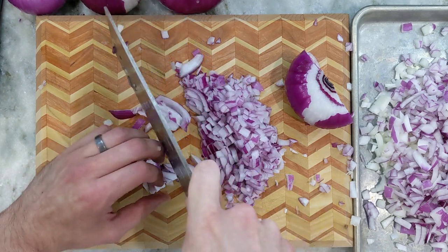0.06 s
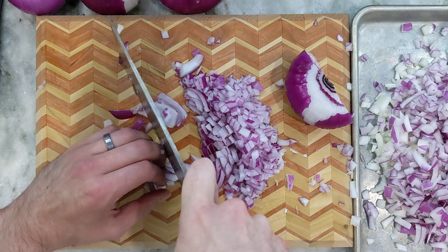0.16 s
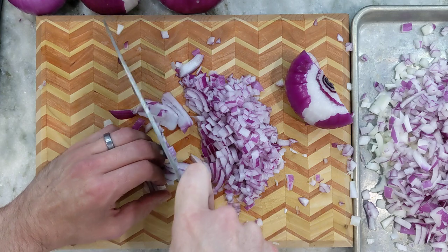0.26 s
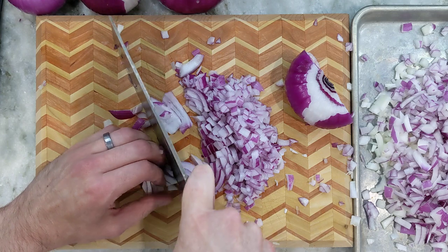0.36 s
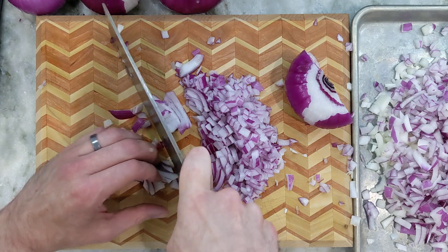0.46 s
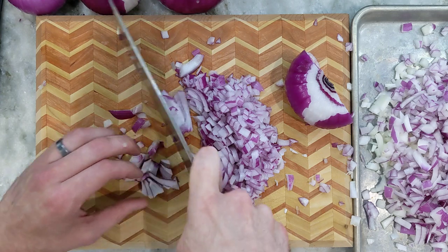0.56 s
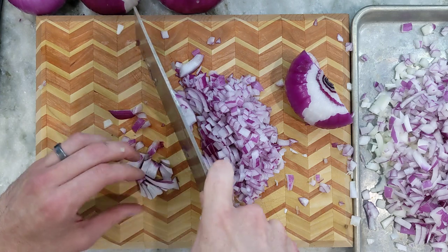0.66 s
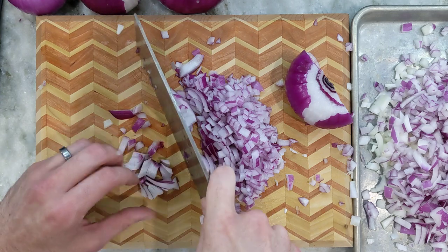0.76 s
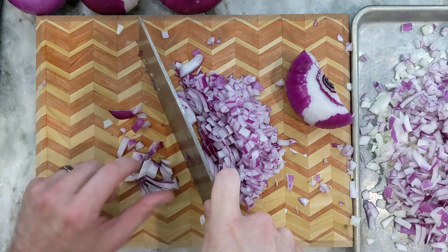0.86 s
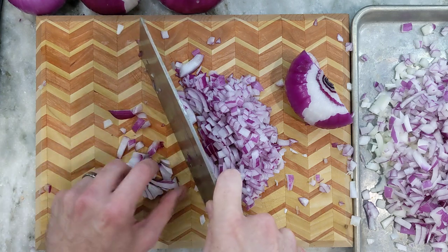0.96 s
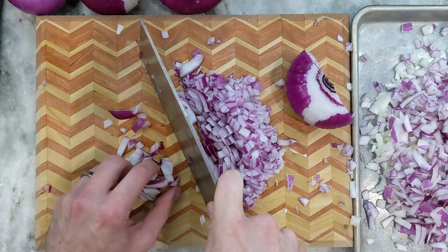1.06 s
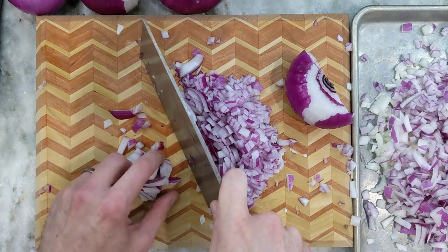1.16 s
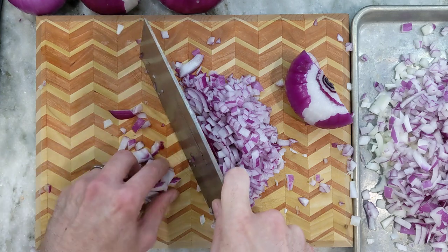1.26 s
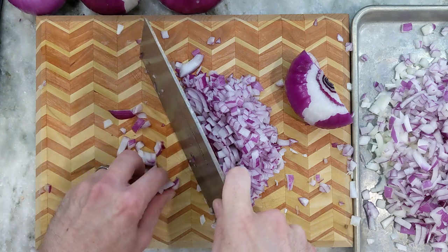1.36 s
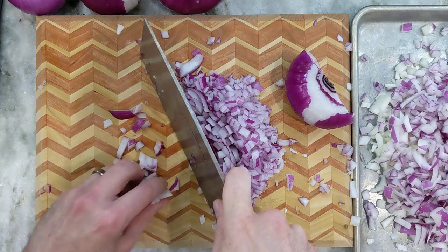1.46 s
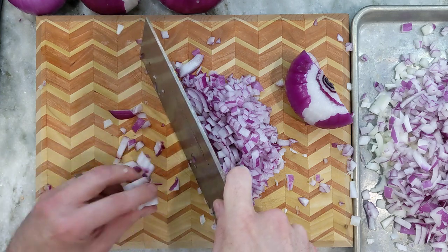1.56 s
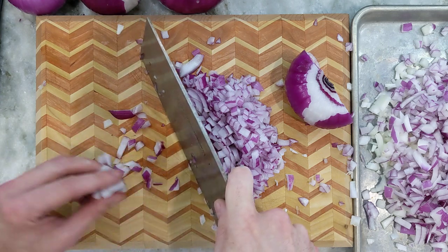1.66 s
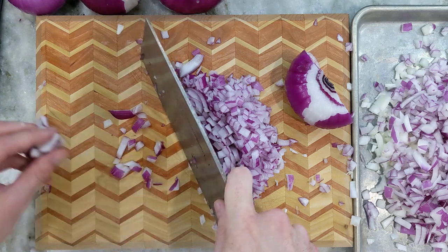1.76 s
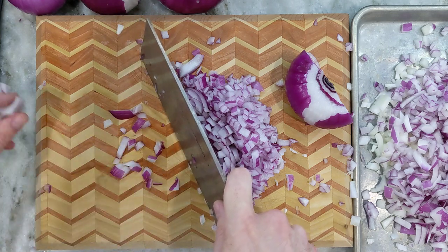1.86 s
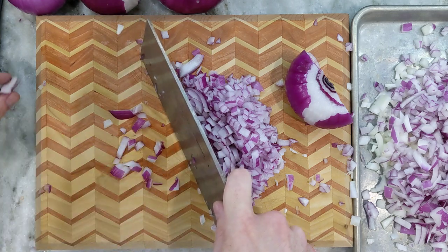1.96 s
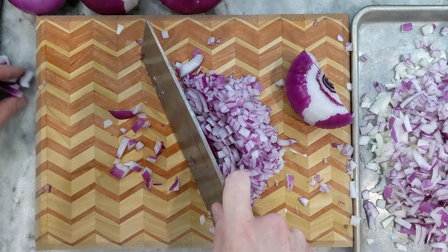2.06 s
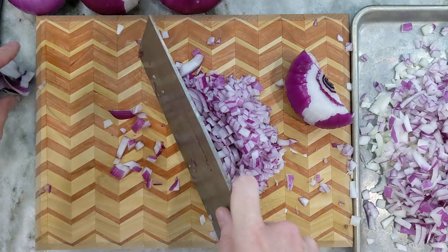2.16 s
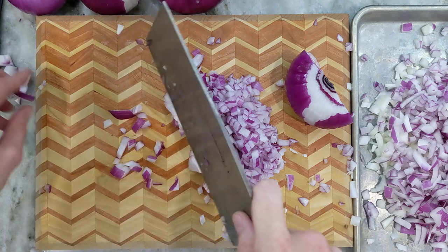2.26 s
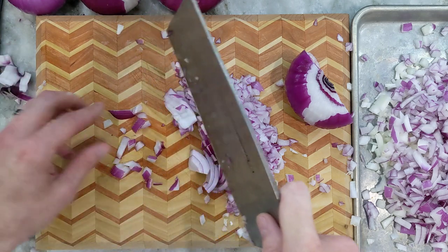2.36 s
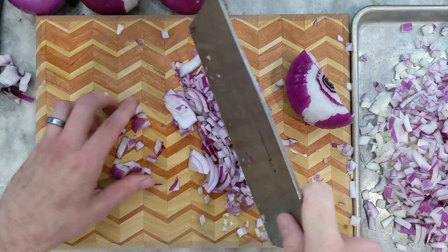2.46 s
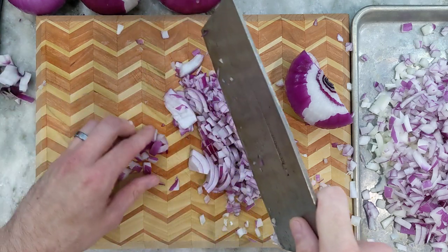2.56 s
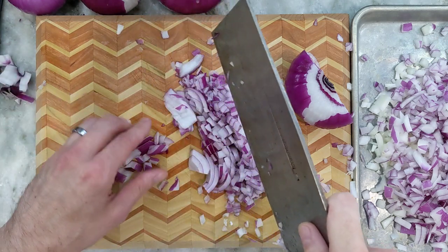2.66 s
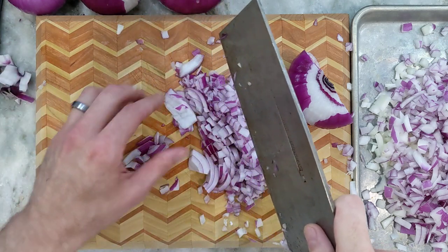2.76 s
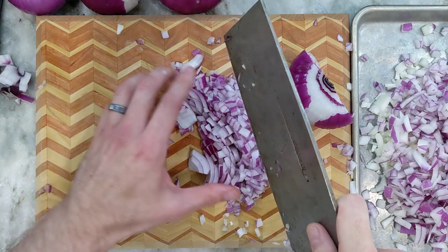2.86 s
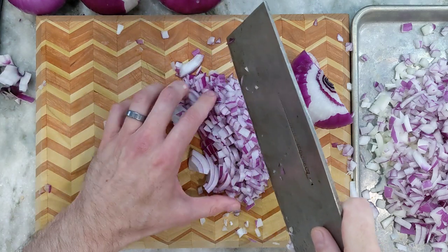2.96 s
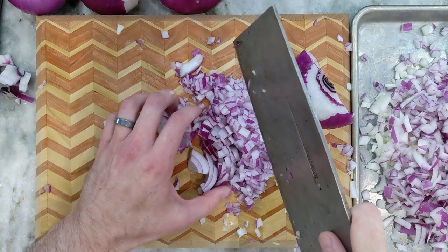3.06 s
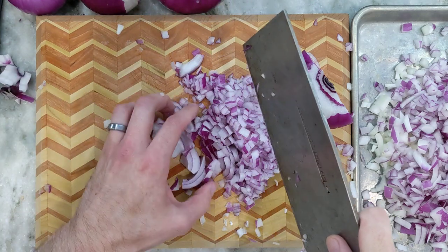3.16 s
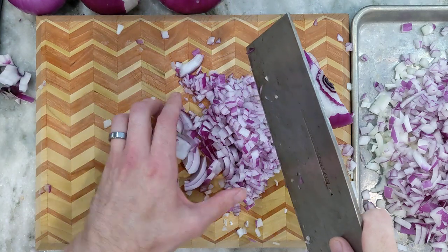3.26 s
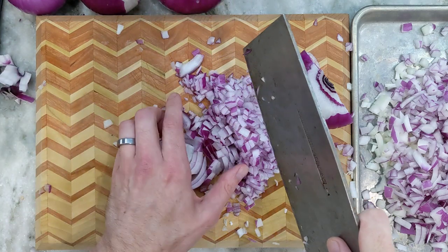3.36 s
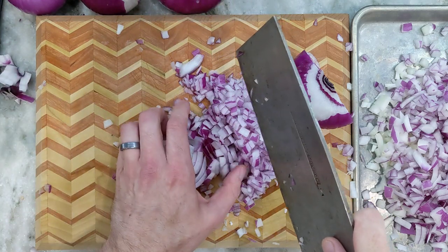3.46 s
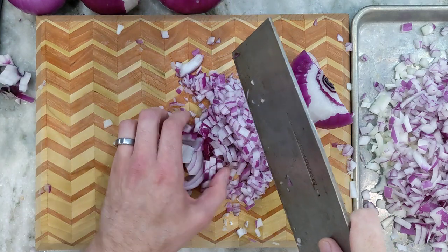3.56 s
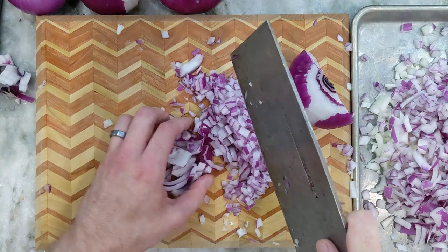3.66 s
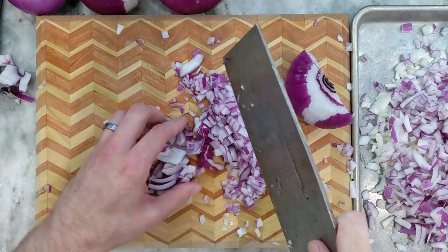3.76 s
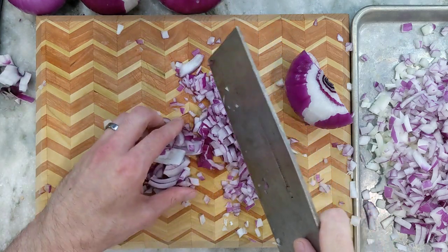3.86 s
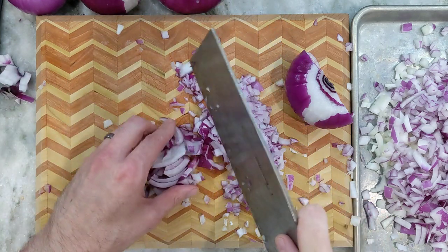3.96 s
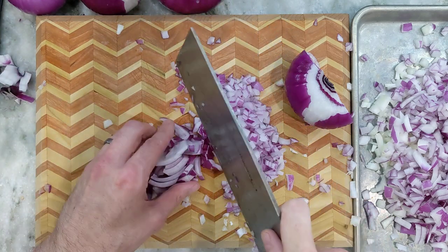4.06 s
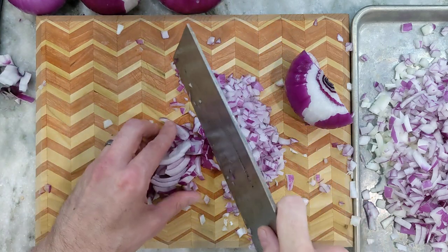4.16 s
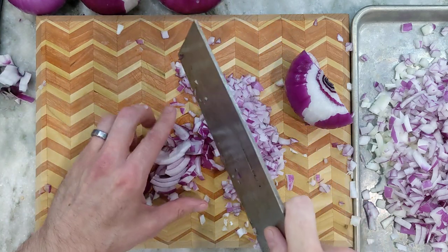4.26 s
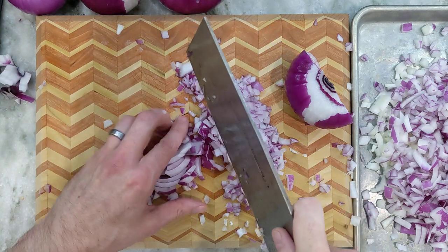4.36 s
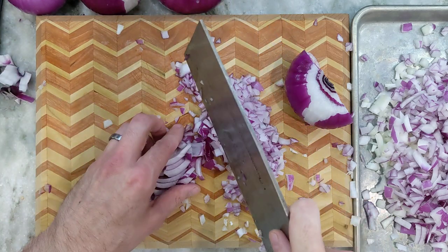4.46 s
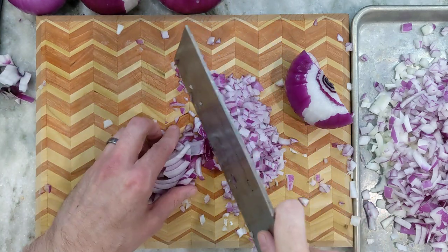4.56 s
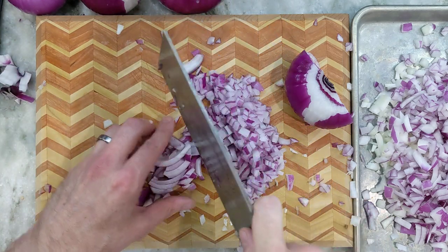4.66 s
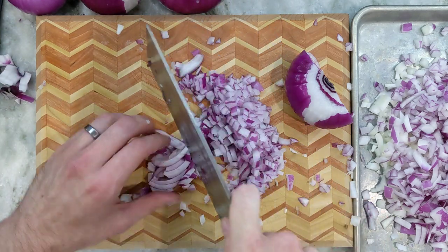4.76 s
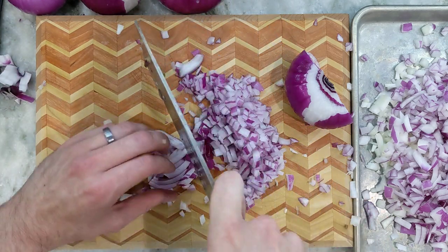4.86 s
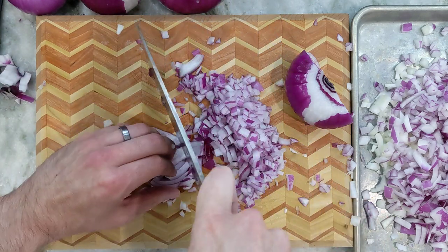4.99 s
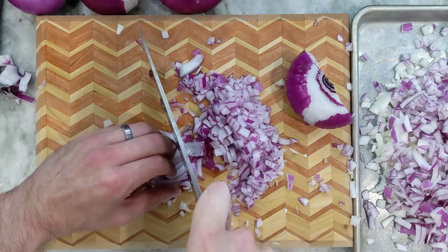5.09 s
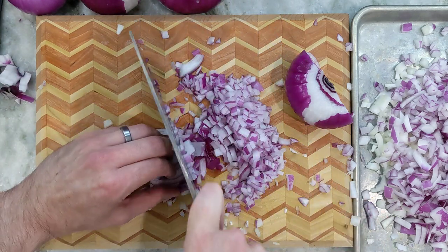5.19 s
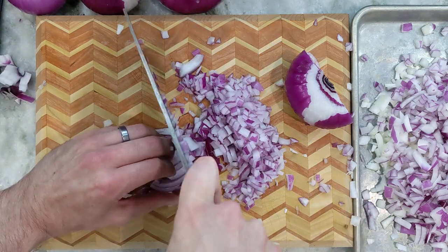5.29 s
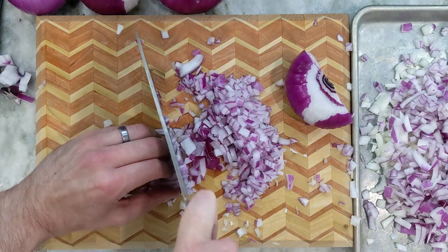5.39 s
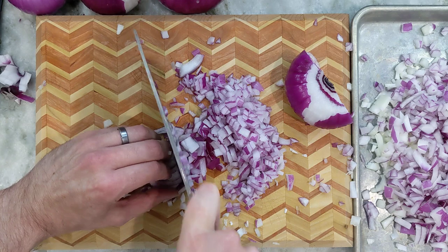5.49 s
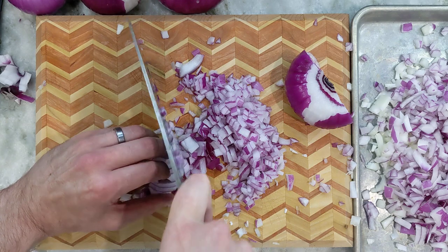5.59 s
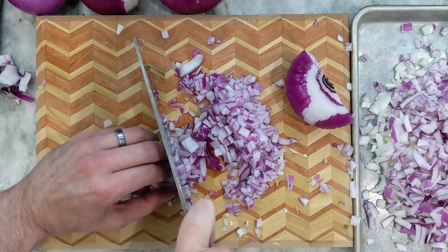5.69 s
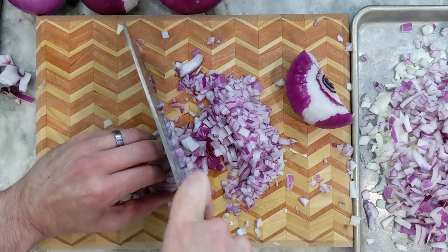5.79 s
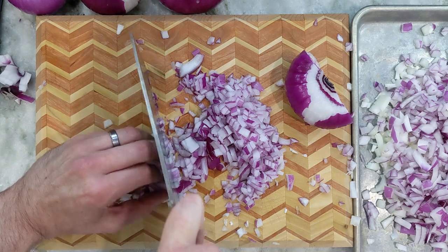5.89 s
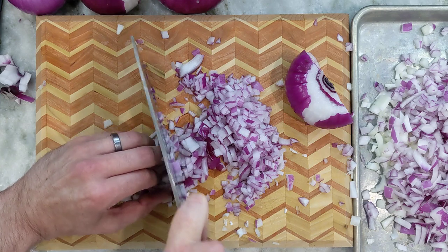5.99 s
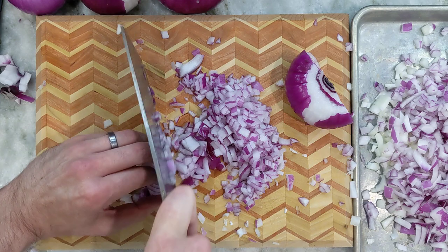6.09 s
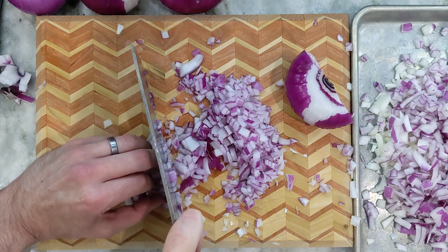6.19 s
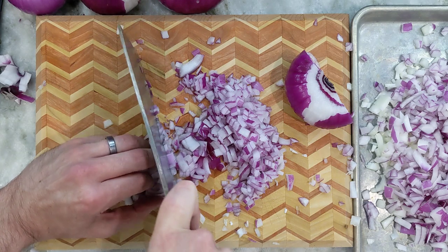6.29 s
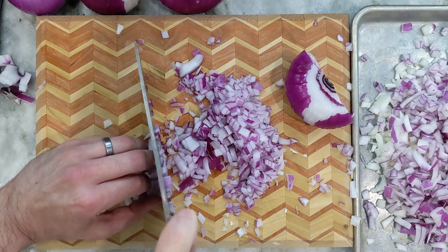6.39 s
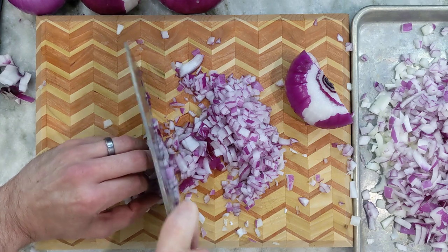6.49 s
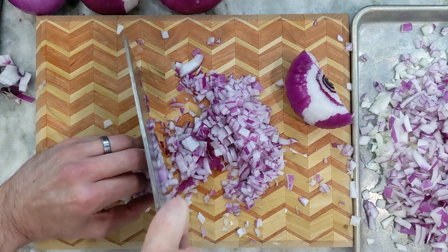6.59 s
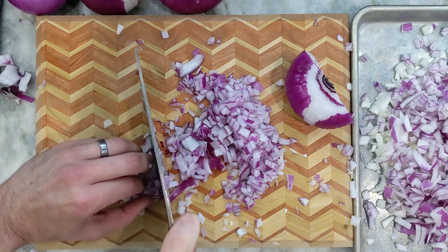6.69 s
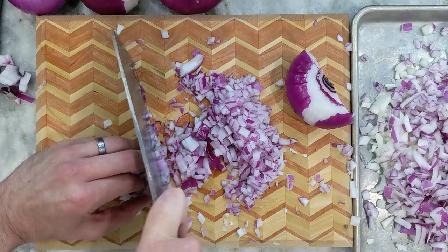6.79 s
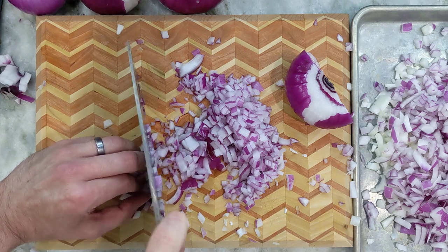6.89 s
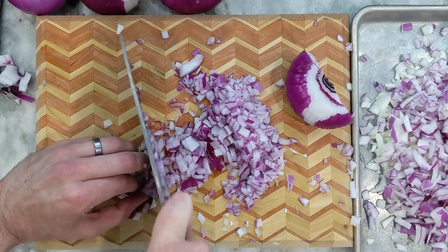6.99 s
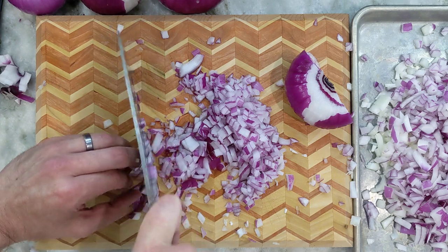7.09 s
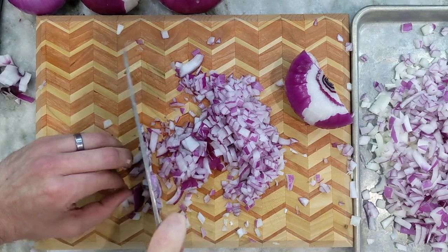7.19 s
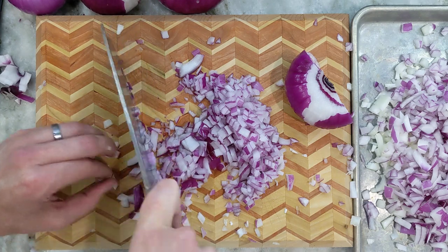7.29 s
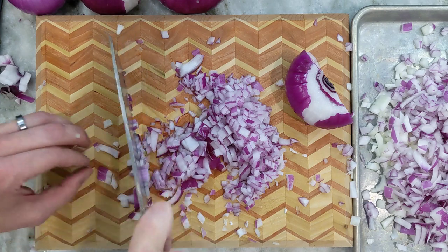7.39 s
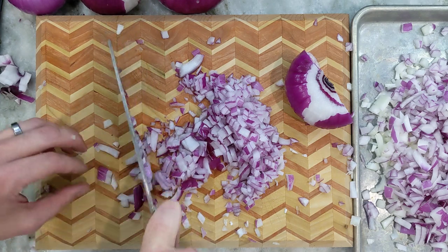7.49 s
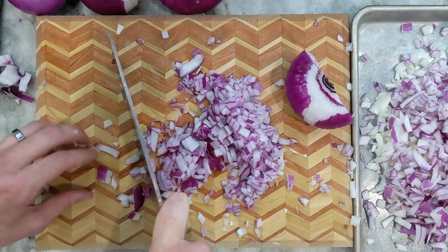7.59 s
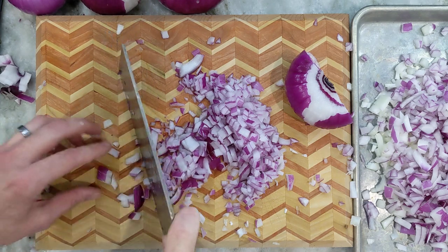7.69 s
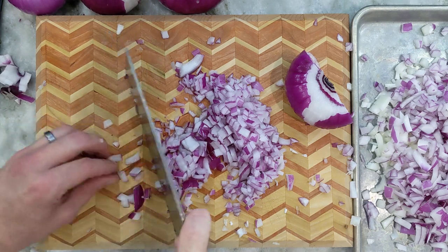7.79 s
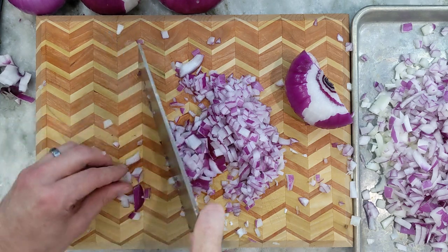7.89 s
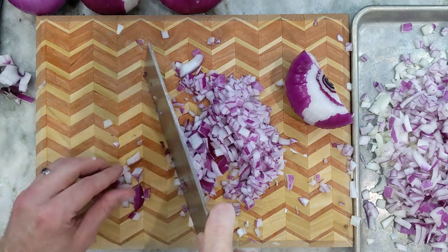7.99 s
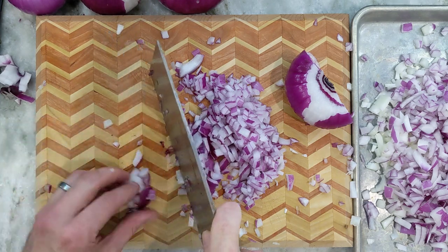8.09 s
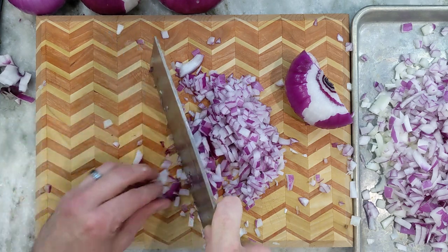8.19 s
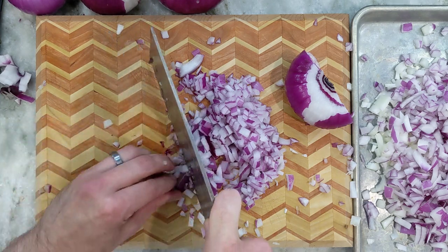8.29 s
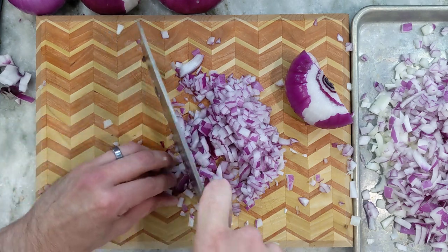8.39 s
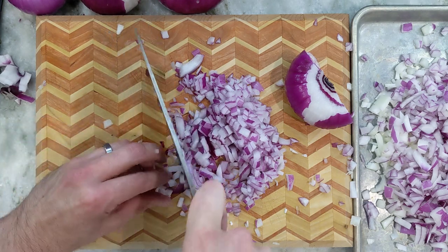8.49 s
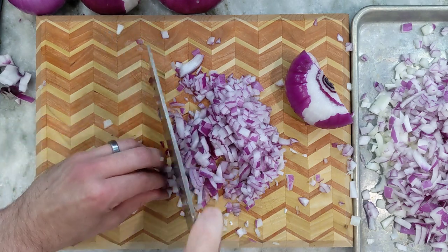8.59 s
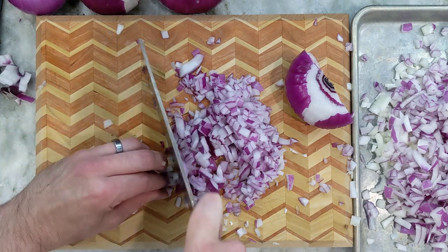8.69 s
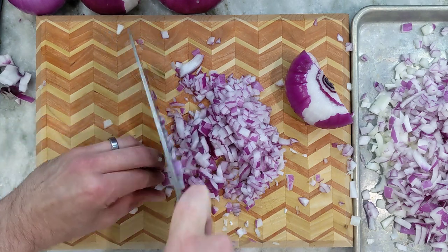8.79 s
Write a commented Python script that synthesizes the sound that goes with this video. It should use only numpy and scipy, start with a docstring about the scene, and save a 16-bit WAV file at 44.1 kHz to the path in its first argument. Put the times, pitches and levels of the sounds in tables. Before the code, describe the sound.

Close onion chopping on a wooden board, with a hard blade knock, a pause of wet rustling, then a steady run of crunchy cuts.

```python
"""A steel cleaver dices onion on a thick wooden board, over a kitchen's motor hum, air noise and echo.
A bare knock rings board and steel and rocks the counter; one cut follows, then a blade sweep and a second knock.
To 4.5 s a hand or blade pushes wet pieces: noise slides and rustles, pieces tick as short tones. A knock at 5 s
opens a run of cuts, about four a second to 7.5 s: snaps thicken into a crunch, then the edge lands on the wood.
More scrapes and ticks, a knock at 8.5 s and a last cut end the scene."""
import sys
import numpy as np
from scipy import signal
from scipy.fft import rfft, irfft, next_fast_len
from scipy.io import wavfile
from scipy.ndimage import uniform_filter1d, map_coordinates

SR = 44100
rng = np.random.default_rng(int(sys.argv[2]) if len(sys.argv) > 2 else 0)


def dump(signal):
    """Clip the signal to [-1, 1] and save it as 16-bit WAV at the path in sys.argv[1]."""
    limited = np.clip(np.atleast_2d(signal).T, -1, 1)
    pcm = np.round(limited * 32767).astype(np.int16)
    wavfile.write(sys.argv[1], SR, pcm)


N = 389844
TIME_S = np.arange(N) / SR

# All dB are relative levels.
# motor hum swells and fades: (time [s], first tone [dB], octave [dB])
HUM_LEVELS = [(0, -58, -69), (.6, -53.5, -67), (1.75, -64.5, -64), (2.2, -54.5, -67), (2.6, -53, -66.5),
              (3.2, -58, -94), (3.8, -76.5, -76.5), (4.9, -57, -65.5), (5.3, -57.5, -62),
              (6.3, -56.5, -64.5), (6.6, -51, -74), (7.4, -57, -68.5), (8.84, -60, -69.5)]
# kitchen rumble drifts: (time [s], level [dB])
RUMBLE_LEVELS = [(0, -53.5), (1.3, -59), (2.4, -59.5), (3.3, -64), (4.2, -62), (5, -57), (8.84, -55.5)]
# rumble spectrum: (frequency [Hz], density [dB per Hz])
RUMBLE_SPECTRUM = [(12, -36.5), (20, -4.5), (53, -6), (67, -11.5), (86, -1.5), (141, -12.5), (172, -19),
                   (195, -20.5), (280, -21), (335, -31.5), (380, -23.5), (642, -39.5), (1500, -47),
                   (1950, -76.5), (3300, -120)]
# hiss spectrum: (frequency [Hz], density [dB per Hz])
HISS_SPECTRUM = [(710, -35), (1200, -15), (1660, -2), (1810, -6), (2650, -7), (2790, -8.5), (3430, -7.5),
                 (5780, -16.5), (8080, -18), (9510, -10.5), (14000, -15), (16000, -26.5)]
# left-right likeness of the air noise: (frequency [Hz], correlation [-1 to 1])
AIR_LIKENESS = [(60, 0.94), (180, 0.68), (550, 0.65), (1650, -0.67), (4970, 0.0025), (15000, -0.041)]
# kitchen decay: (frequency [Hz], t60 [s])
KITCHEN_T60 = [(100, 0.49), (300, 0.74), (800, 0.29), (2000, 0.4), (5000, 0.26), (12000, 0.21)]
# port colour: (frequency [Hz], left over right [dB])
PORT_LEAN = [(60, 1), (150, -1), (380, -2), (950, -1.5), (2380, -1.5), (5980, -1), (15000, 1.5)]
# reflections off close surfaces: (left delay [s], right delay [s], level [dB])
NEAR_ECHOES = [(.0042, 0.004, -9.5), (.0092, .0086, -12), (0.0137, .0139, -11)]
# counter modes: (frequency [Hz], level [dB], time to full swing [s])
COUNTER_MODES = [(29.44, -12.5, 0.13), (41.94, 1, 0.045), (62.2, -7.5, .045), (91.2, -8.5, 0.045),
                 (118.8, -7.5, 0.026), (163.4, -15.5, .02)]
# board modes: (frequency [Hz], width [Hz], level [dB])
BOARD_MODES = [(269, 78, -5.5), (403, 47, -2), (449, 70, -1.5), (580, 130, -3.5), (859, 75, 1.5),
               (906, 81, -2.5), (1087, 76, -8.5), (1541, 220, -13.5), (1825, 310, -16), (2300, 83, -18.5),
               (2800, 250, -25.5), (3300, 470, -19), (4460, 1000, -29.5)]
# steel modes, blade swept free: (frequency [Hz], width [Hz], level [dB])
FREE_BLADE_MODES = [(1360, 45, 0.5), (1730, 28, -8.5), (2236, 49, -9.5), (2768, 100, -3.5),
                    (3292, 120, -9.5), (5456, 120, -16.5), (6760, 62, -11), (9490, 240, -12.5),
                    (11100, 200, -29)]
# steel modes, blade resting on the wood: (frequency [Hz], width [Hz], level [dB])
PRESSED_BLADE_MODES = [(1841, 65, -4.5), (2170, 45, -6.5), (3010, 56, -8)]
# sliding on wood: (frequency [Hz], density [dB per Hz])
SLIDE_SPECTRUM = [(240, -48.5), (400, -19), (629, -6), (738, -11.5), (1070, -3.5), (1500, -16.5),
                  (2590, -19.5), (3040, -17.5), (6000, -25), (7800, -61), (13200, -120)]
# wet pieces rustling: (frequency [Hz], density [dB per Hz])
RUSTLE_SPECTRUM = [(1470, -32.5), (2500, -3), (5440, -4.5), (6810, 1), (8140, -5), (10700, 4),
                   (12600, -6.5), (14900, -7.5), (16000, -17.5)]
# crunch: (frequency [Hz], density [dB per Hz])
CRUNCH_SPECTRUM = [(880, -30.5), (1500, -21.5), (1870, -3.5), (2540, -20), (2880, -1), (3590, -8),
                   (4290, 0), (4830, -4.5), (6370, -3.5), (7840, -4.5), (10900, 1), (14600, -8.5),
                   (16000, -7.5)]
# fleshy part of a cut: (frequency [Hz], density [dB per Hz])
FLESH_SPECTRUM = [(200, -11.5), (450, -13), (700, -2.5), (1050, 1), (1500, -12), (2500, -10.5), (5000, -39)]
# hand or blade pushes the pieces: (full strength [s], rise [s], hold [s], sliding [dB], wet rustle [dB],
# blade swept along [0-1], blade pressed on the wood [0-1])
PUSHES = [(0.001, .01, 0.012, -74, -83, 0.5, 0.25), (0.166, 0.24, 0.054, -74.5, -84, .03, 0.1),
          (0.627, 0.015, 0.034, -51, -55, 0.92, 0.23), (0.752, .08, 0.13, -73.5, -96, 0.57, 0.2),
          (1.067, .06, .01, -72.5, -77, 0.2, 0.6), (1.363, 0.036, 0.043, -68, -84, 0.3, 0.63),
          (1.408, 0.014, 0.014, -58.5, -72, 0, 0.74), (2.13, 0.022, 0.0041, -68.5, -86, 0.4, 0.75),
          (2.542, 0.071, 0.082, -71.5, -76, 0, 0.2), (2.974, 0.026, .04, -83.5, -85, .06, 0.23),
          (3.084, .04, 0.05, -70.5, -79, .06, .13), (3.15, .04, 0.016, -70.5, -76.5, 0, 0.3),
          (3.28, .1, 0.072, -79.5, -86.5, 0, 0), (3.548, 0.11, 0.053, -80.5, -65, .05, .13),
          (4.01, 0.037, .005, -75.5, -88.5, 0, 0.07), (4.12, 0.028, 0.0044, -86.5, -88, 0.06, 0.07),
          (4.43, 0.01, 0.047, -69, -81.5, .03, 0), (4.985, 0.059, 0.13, -71.5, -76, .02, 0.2),
          (5.191, .05, .03, -59, -59.5, .02, 0.46), (7.937, 0.38, 0.0025, -52.5, -57, 0.69, 0.43),
          (8.05, 0.091, 0.038, -68, -77, 0.8, 0.15), (8.186, 0.055, 0.16, -78.5, -71.5, 0, .03),
          (8.59, 0.078, .005, -57.5, -67, 0.3, .02), (8.623, .03, 0.089, -71, -79, .02, 0.1)]
# wet pieces unstick and drop: (time [s], level [dB], pitch [Hz], tap on wood [dB])
PIECE_TICKS = [(1.0605, -58, 3200, -22), (1.0805, -59.5, 3187, -26), (1.3152, -55, 7000, -40),
               (1.367, -58, 9410, -30), (1.419, -42.5, 2950, -21), (1.725, -60.5, 7040, -34),
               (2.1321, -66.5, 2930, -21), (2.5143, -56, 3460, -19.5), (2.5329, -57.5, 4990, -26),
               (2.5992, -51, 3240, -21), (2.961, -67.5, 2910, -29), (3.003, -59, 9200, -45),
               (3.1594, -47, 10680, -16), (3.3634, -57, 9900, -31.5), (3.5638, -41, 11640, -38.5),
               (3.6044, -52, 9500, -32.5), (3.7732, -62.5, 6920, -43), (4.127, -58.5, 2950, -39),
               (4.129, -58, 1210, -28), (4.4306, -65.5, 7100, -21.5), (7.867, -39.5, 3200, -9),
               (8.2018, -52, 3060, -18.5), (8.2499, -51.5, 4470, -26), (8.3393, -63, 2900, -24)]
# bare edge on wood: (time [s], blow [dB], crack over blow [dB], counter shake over blow [dB], contact [ms],
# rebound [0-1], lowest steel mode [dB], second steel mode [dB])
EDGE_KNOCKS = [(.218, -8.5, -30, -11.5, 0.061, 0.4, 4, 22.5), (.951, -26, -40, -11, 0.08, 0.7, -12, -16),
               (4.982, -22, -20, -5.5, 0.051, 0.5, 12, -18), (8.51, -16, -22, -8, 0.03, 0.23, 18, 8)]
# cuts: (landing [s], swell [s], full crunch [s], crunch [dB], fleshy part [dB], landing blow [dB],
# counter shake [dB], coarse part over crunch [dB], pieces tumbling afterwards [dB])
ONION_CUTS = [(0.423, .025, 0.028, -39.5, -46, 3.5, -30, -5.5, -73),
              (5.258, 0.0305, 0.031, -37, -44, 8, -36.5, -4, -56),
              (5.545, 0.039, 0.039, -35, -45.5, -3, -41, -5, -56),
              (5.793, .035, .025, -33, -41.5, -9, -39.5, -8.5, -57),
              (6.048, 0.02, 0.035, -35, -45, -8.5, -33.5, -7.5, -56),
              (6.29, 0.0074, 0.039, -44.5, -53, -4, -34, 0, -58),
              (6.544, 0.011, 0.046, -36, -46.5, -6, -37, -6, -53.5),
              (6.782, 0.016, 0.04, -36.5, -46, -9, -38.5, -5.5, -54.5),
              (7.02, 0.02, .022, -35, -39.5, 0.5, -32.5, -5.5, -55),
              (7.274, 0.014, 0.019, -34, -39.5, 4.5, -33.5, -5, -54),
              (7.532, 0.0052, 0.019, -43.5, -41.5, 2.5, -32, -5, -61),
              (8.731, 0.012, 0.017, -38, -37, -6, -32.5, -3.5, -59.5)]

HUM_HZ, MAINS_HZ = 82.7, 120
TOP_HZ = 15900
MAX_SNAP_SPREADS = 5.5  # cap on snap size, in spreads
TICK_S, TICK_CYCLES = .008, 30  # a tick falls 60 dB in TICK_S plus this many cycles
ROCK_S, ROCK_DB = .014, -6  # the landed edge rocks and touches again
CRUNCH_GROWTH_DB, FLESH_GROWTH_DB = 2.6, 5  # growth towards the landing
PUSH_RISE_DB, PUSH_FALL_DB_PER_S = 37, 216.5
# pieces tumble off the blade after a cut, then settle while it lifts
TUMBLE_DELAY_S, TUMBLE_SLIDE_DB, TUMBLE_FALL_DB_PER_S = .04, -5, 174  # sliding re rustle
LIFT_END_S, LIFT_SLIDE_DB, LIFT_RUSTLE_DB = .222, -68, -67.5
LIFT_SWEPT, LIFT_PRESSED = .15, .33
RESTING_SLIDE_DB, RESTING_RUSTLE_DB = -88, -88.5  # a hand never quite still


def amp(db):
    """dB to amplitude."""
    return 10 ** (np.asarray(db) / 20)


def unit(x):
    """Scale to rms 1."""
    return x / np.sqrt(np.mean(x ** 2) + 1e-20)


def along(points, hz):
    """Interpolate (Hz, value) points on a log-frequency axis."""
    point_hz, value = np.transpose(points)
    return np.interp(np.log(hz + 1), np.log(point_hz + 1), value)


def spectrum_gain(points):
    """Amplitude response from (Hz, dB) points."""
    return lambda hz: amp(along(points, hz))


def curves(rows):
    """One value per sample for each column after the time."""
    time_s, *columns = np.transpose(rows)
    return [np.interp(TIME_S, time_s, column) for column in columns]


def wobble(rate_hz):
    """Smooth random curve with rate_hz knots a second."""
    knots = rng.standard_normal(int(N * rate_hz / SR) + 4)
    return map_coordinates(knots, [TIME_S * rate_hz])


def filtered(x, response):
    """Apply a complex frequency response."""
    size = next_fast_len(N + SR // 2)
    hz = np.fft.rfftfreq(size, 1 / SR)
    return irfft(rfft(x, size) * response(hz), size)[..., :N]


def body(modes):
    """Causal resonances (Hz, width, dB), alternating in sign."""
    def response(hz):
        total = 0
        for k, (centre, width, db) in enumerate(modes):
            damping = 1j * hz * width
            total = total + (-1) ** k * amp(db) * damping / (centre ** 2 - hz ** 2 + damping)
        return total
    return response


def crackle(response, spread_db, wide=1.0):
    """Dense snaps of unequal size, rms 1; the wide share differs by port."""
    size_db = spread_db * np.minimum(rng.exponential(size=N), MAX_SNAP_SPREADS)
    snaps = rng.standard_normal((3, N)) * amp(size_db)
    return unit(filtered(snaps[0] + wide * snaps[1:], response))


def hum():
    """Unsteady motor tone and octave, plus a rough narrow-band mains buzz; alike at both ports."""
    first_db, octave_db = curves(HUM_LEVELS)
    phase = 2 * np.pi * HUM_HZ * TIME_S + .58 * wobble(2.7)
    first = amp(first_db + .25 * wobble(14.0)) * np.sin(phase)
    octave = amp(octave_db + .29 * wobble(6.0)) * np.sin(2 * phase)
    buzz = unit(filtered(rng.standard_normal(N), body([(MAINS_HZ, 7, 0), (144, 8, -7)])))
    return np.sqrt(2) * (first + octave) + amp(-63) * buzz


def air(spectrum, level_db):
    """Slowly drifting stereo noise; the mid-side balance sets the likeness of the ports."""
    def mid_side(hz):
        angle = np.arccos(np.clip(along(AIR_LIKENESS, hz), -1, 1)) / 2
        return amp(along(spectrum, hz)) * [np.cos(angle), np.sin(angle)]
    mid, side = filtered(rng.standard_normal((2, N)), mid_side)
    drift_db = .6 * wobble(.7)
    return amp(level_db + drift_db) * unit(np.array([mid + side, mid - side]))


def kitchen(x, part_s=.4):
    """Noise-tail echo: each frequency dies at its own speed; the pattern is redrawn every part_s."""
    out, step = np.zeros((2, N + SR)), round(part_s * SR)
    for start in range(0, N, step):
        hz, t_s, z = signal.stft(rng.standard_normal((2, SR // 2)), SR, nperseg=256)
        # long waves reach both ports alike
        mono = np.clip(along([(150, .98), (600, .55), (2000, 0)], hz), 0, 1)[:, None]
        z[1] = mono * z[0] + np.sqrt(1 - mono ** 2) * z[1]
        decay = amp(-60 * t_s / along(KITCHEN_T60, hz)[:, None])
        tail = signal.istft(z * decay, SR, nperseg=256)[1]
        tail = tail / np.linalg.norm(tail[0])
        echo = signal.fftconvolve(x[None, start:start + step], tail, axes=1)
        out[:, start + 150:][:, :echo.shape[1]] += echo  # 150-sample pre-delay
    return out[:, :N]


def ports(x, lag_s, right_db):
    """Board sound reaches the right port first, then again, duller, off close surfaces."""
    echo = np.zeros((2, N))
    for *delays_s, db in NEAR_ECHOES:
        for side, delay_s in enumerate(delays_s):
            echo[side] += amp(db) * np.pad(x[side], (round(delay_s * SR), 0))[:N]

    def lean(hz):
        level = amp(np.outer([.5, -.5], along(PORT_LEAN, hz) - right_db))
        return level * np.exp(np.outer([-1, 1], 1j * np.pi * hz * lag_s))
    return filtered(x + uniform_filter1d(echo, size=7, axis=1), lean)


def shake(rows):
    """Blows (s, dB, weight 0-1) rock the counter: low modes swell and die."""
    out, t_s = np.zeros(N + SR), np.arange(SR // 3) / SR
    for s, db, weight in rows:
        for k, (hz, mode_db, full_s) in enumerate(COUNTER_MODES):
            # a light bare knock moves the slow modes less
            light_db = (1 - weight) * 16.0 * np.clip(90 / hz - .7, 0, 2)
            gain = amp(db + mode_db + rng.normal(0, 1.2) - light_db)
            swell = (t_s / full_s * np.exp(1 - t_s / full_s)) ** 3.23
            after = .18 * (1 - np.exp(-t_s / full_s)) * np.exp(-t_s / .1)
            wave = (swell + after) * np.sin(2 * np.pi * hz * t_s)
            out[round(s * SR):][:len(t_s)] += (-1) ** k * gain * wave
    return out[:N]


def motion(s, rise_s, hold_s, slide_db, rustle_db, swept, pressed, fall_db_per_s=PUSH_FALL_DB_PER_S):
    """Power of one push on wood, swept steel, pressed steel, wet pieces: rise, hold, fade."""
    before_db = PUSH_RISE_DB * np.clip(s - TIME_S, 0, 1) / rise_s
    after_db = fall_db_per_s * np.clip(TIME_S - s - hold_s, 0, 1)
    shape = amp(-2 * (before_db + after_db))
    share = np.array([max(1 - swept ** 2 - pressed ** 2, 0), swept ** 2, pressed ** 2])
    return np.outer([*(amp(2 * slide_db) * share), amp(2 * rustle_db)], shape)


def strokes():
    """Sliding excites wood or steel modes; wet pieces rustle in clumps."""
    power = sum(motion(*row) for row in PUSHES)
    for land_s, *_, tumble_db in ONION_CUTS:
        s = land_s + TUMBLE_DELAY_S
        power += motion(s, .03, .0018, tumble_db + TUMBLE_SLIDE_DB, tumble_db,
                        LIFT_SWEPT, LIFT_PRESSED, TUMBLE_FALL_DB_PER_S)
        power += motion(s, .072, LIFT_END_S - TUMBLE_DELAY_S, LIFT_SLIDE_DB, LIFT_RUSTLE_DB,
                        LIFT_SWEPT, LIFT_PRESSED)
    wood, swept, pressed, wet = np.sqrt(power)
    on_wood = amp(4.0 * wobble(45)) * crackle(spectrum_gain(SLIDE_SPECTRUM), spread_db=3.0)
    on_steel = swept * crackle(body(FREE_BLADE_MODES), spread_db=.5)
    on_steel += pressed * crackle(body(PRESSED_BLADE_MODES), spread_db=-.5)
    stutter = amp(1.13 * wobble(66))  # edge over the grain
    rustle = amp(1.4 * wobble(70)) * crackle(spectrum_gain(RUSTLE_SPECTRUM), spread_db=3.6)
    slide = (wood + amp(RESTING_SLIDE_DB)) * on_wood + stutter * on_steel
    return slide + (wet + amp(RESTING_RUSTLE_DB)) * rustle


def blows(rows):
    """Force pulses (s, dB, contact ms, rebound) ring the board: heel of the edge first, then its length."""
    force, ms = np.zeros(N + SR), np.arange(SR // 100) / SR * 1000

    def pulse(contact_ms):
        shape = ms * np.exp(-ms / contact_ms)
        return shape / np.sum(shape)
    for s, db, contact_ms, rebound in rows:
        # springing back removes the slow push and weakens the low modes
        push = amp(db) * (pulse(contact_ms) - rebound * pulse(.22))
        force[round((s - .0016) * SR):][:len(ms)] += .28 * push
        force[round(s * SR):][:len(ms)] += push
    return filtered(force[:N], body(BOARD_MODES))


def ticks():
    """Each tick is a short decaying tone with fluttering level, over a tap on the wood."""
    out, t_s = np.zeros(N + SR), np.arange(SR // 25) / SR
    for s, db, hz, _ in PIECE_TICKS:
        fade = amp(-60 * t_s / (TICK_S + TICK_CYCLES / hz))
        flutter = unit(uniform_filter1d(rng.standard_normal(len(t_s)), size=round(3 * SR / hz)))
        tone = (.98 + .4 * flutter) * np.sin(2 * np.pi * hz * t_s)
        out[round(s * SR):][:len(t_s)] += amp(db) * fade * tone
    return out[:N] + blows([(s, tap_db, .035, .9) for s, *_, tap_db in PIECE_TICKS])


def knocks():
    """Bare edge hits the board: wood ring, short crack, faint ring of two steel modes."""
    crack, force, hits = np.zeros(N), np.zeros((2, N)), []
    for s, db, crack_db, _, contact_ms, rebound, first_db, second_db in EDGE_KNOCKS:
        age_s = TIME_S - s - .0004
        fade = np.exp(-np.abs(age_s) / .0054) + .15 * np.exp(-np.abs(age_s) / .023)
        crack += (age_s > 0) * amp(db + crack_db - 2.5) * fade
        # which mode rings depends on where the edge lands
        force[:, round(s * SR) + 60] = amp([first_db, second_db])
        hits.append((s + .002, db + 37.0, contact_ms, rebound))
    steel = sum(filtered(force[k], body(PRESSED_BLADE_MODES[k:k + 1])) for k in (0, 1))
    snaps = crackle(spectrum_gain(CRUNCH_SPECTRUM), spread_db=6)
    return blows(hits) + steel + crack * snaps


def cuts():
    """Bursting cells: snap noise swells as the edge goes in, until it lands softly on the wood."""
    bites, coarse_bites, fleshy = np.zeros((3, N))
    landings = []
    for land_s, swell_s, full_s, crunch_db, flesh_db, blow_db, _, coarse_db, _ in ONION_CUTS:
        start_s = land_s - full_s
        near = slice(round(land_s * SR) - SR // 6, round(land_s * SR) + SR // 12)
        at_s = [start_s - 1.6 * swell_s, start_s - swell_s, start_s,
                land_s - .008, land_s + .0073, land_s + .052]
        bite_db = [-60, -26, -CRUNCH_GROWTH_DB / 2, CRUNCH_GROWTH_DB / 2, -18, -50]
        pulp_db = [-63, -32.5, -FLESH_GROWTH_DB / 2, FLESH_GROWTH_DB / 2, -8, -50.5]
        bite = amp(crunch_db + np.interp(TIME_S[near], at_s, bite_db))
        bites[near] += bite
        coarse_bites[near] += bite * amp(coarse_db)
        fleshy[near] += amp(flesh_db + np.interp(TIME_S[near], at_s, pulp_db))
        for k in (0, 1):
            landings.append((land_s - .003 + k * ROCK_S, blow_db + k * ROCK_DB, .15, 0))
    crunch = spectrum_gain(CRUNCH_SPECTRUM)
    dull = lambda hz: 1 / (1 + (hz / 5500) ** 4)
    fine = bites * crackle(lambda hz: crunch(hz) * (1 - dull(hz)), spread_db=2.8)
    coarse = crackle(lambda hz: crunch(hz) * dull(hz), spread_db=2.0)
    coarse = coarse_bites * amp(1.4 * wobble(150)) * coarse
    lumps = amp(1.4 * wobble(250) + .71 * wobble(70))  # layer after layer gives way
    flesh = crackle(spectrum_gain(FLESH_SPECTRUM), spread_db=4.5, wide=.63)
    flesh = fleshy * amp(2.9 * wobble(120)) * flesh
    return lumps * (fine + coarse) + flesh + blows(landings)


def scene():
    """Near sound at two ports, its kitchen echo, counter shake and room noise."""
    room = hum() + air(RUMBLE_SPECTRUM, *curves(RUMBLE_LEVELS)) + air(HISS_SPECTRUM, level_db=-78.0)
    knock_shakes = [(s, db + shake_db - 1.5, 0) for s, db, _, shake_db, *_ in EDGE_KNOCKS]
    cut_shakes = [(cut[0], cut[6], 1) for cut in ONION_CUTS]
    low = shake(knock_shakes + cut_shakes)
    onion = strokes() + ticks() + cuts()
    wood = knocks()
    near = ports(wood, lag_s=.00015, right_db=1.18) + ports(onion, lag_s=.00014, right_db=.11)
    echo = kitchen(amp(-7) * (wood.mean(0) + onion.mean(0)))
    return near + echo + low + room


def record(dry):
    """The phone keeps nothing above its band limit."""
    return filtered(dry, lambda hz: hz < TOP_HZ)


dry = scene()
out = record(dry)
dump(out)
```